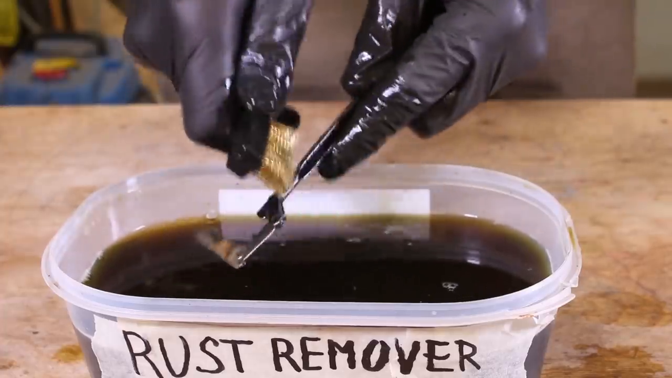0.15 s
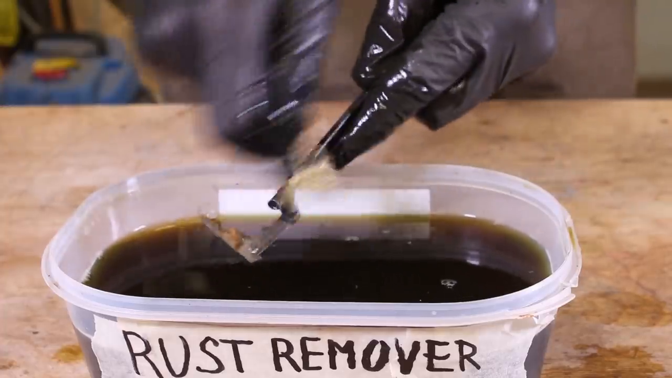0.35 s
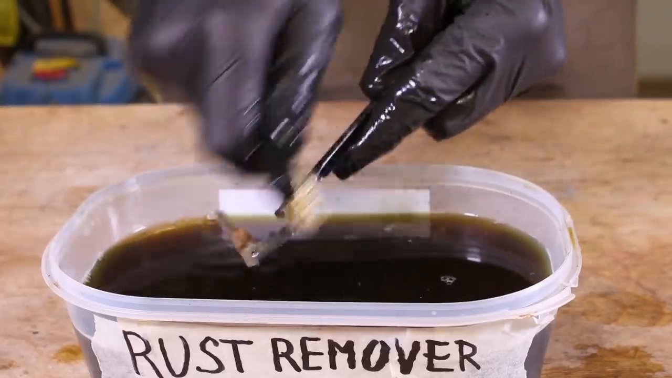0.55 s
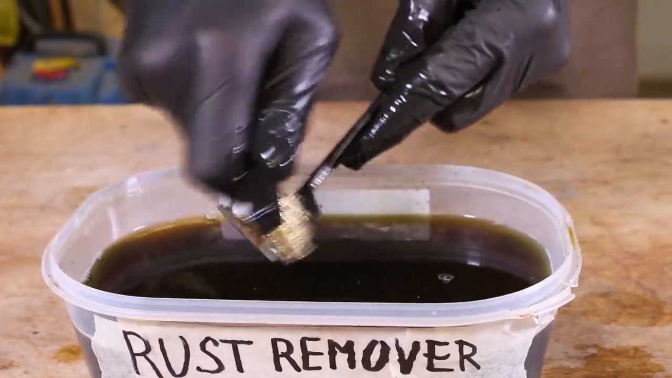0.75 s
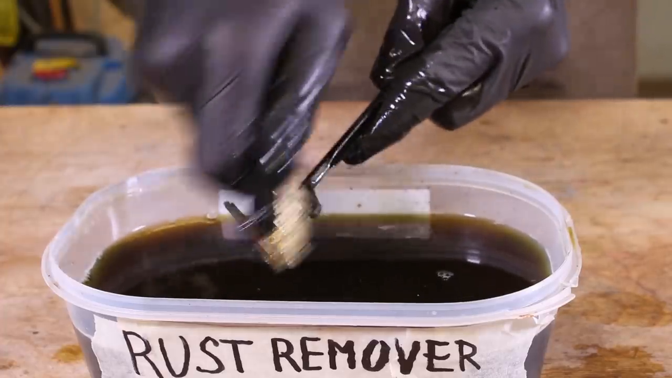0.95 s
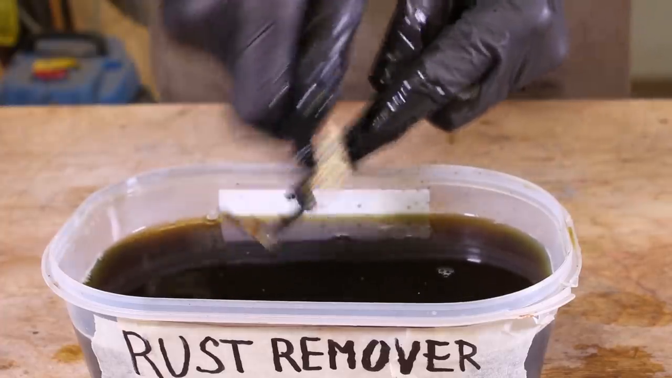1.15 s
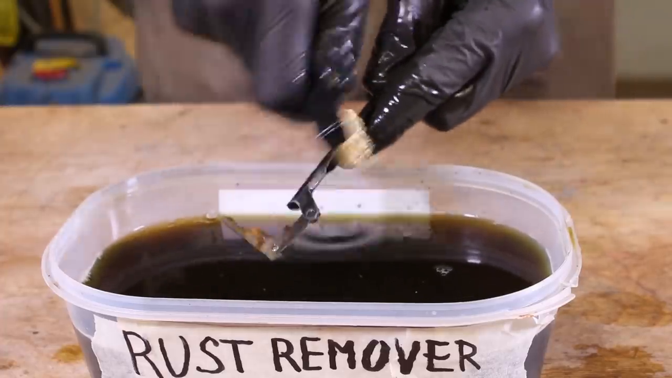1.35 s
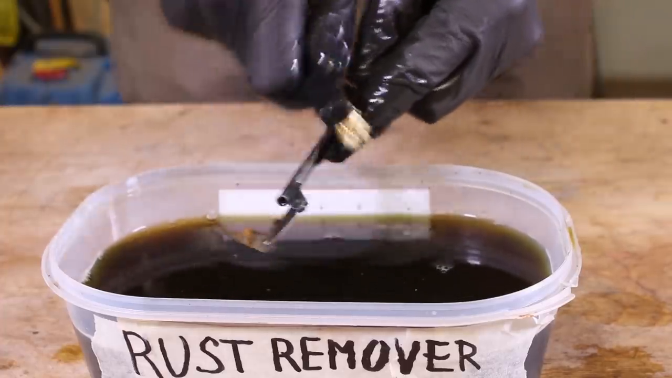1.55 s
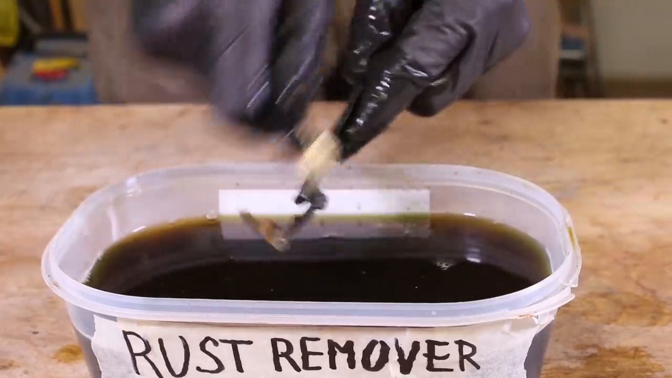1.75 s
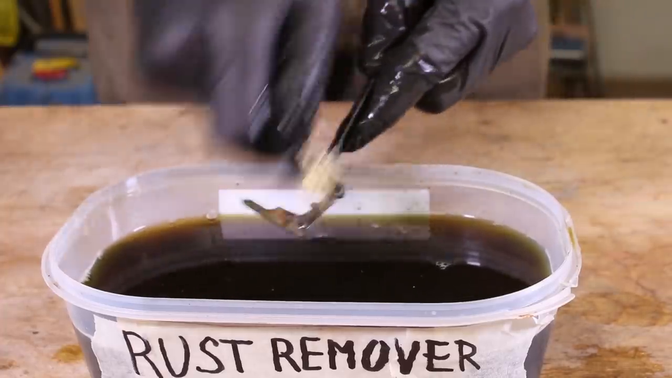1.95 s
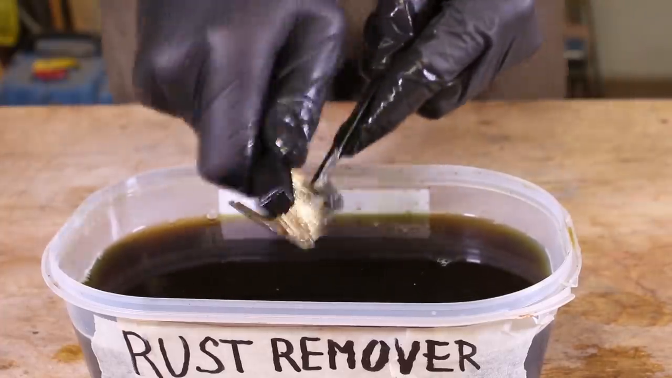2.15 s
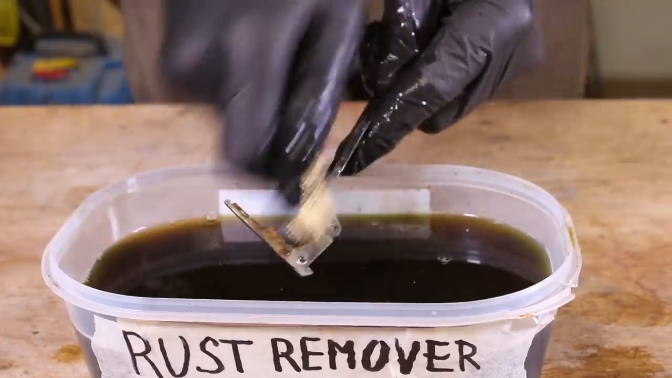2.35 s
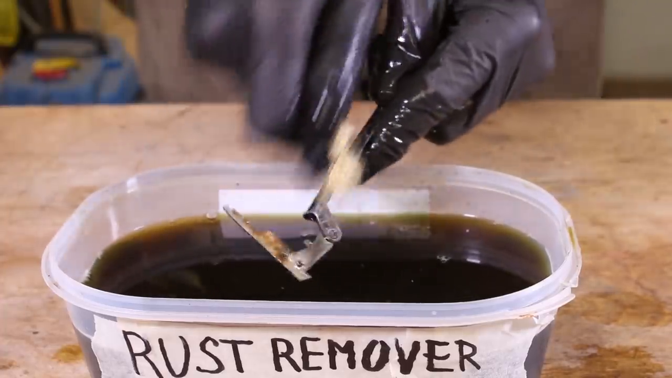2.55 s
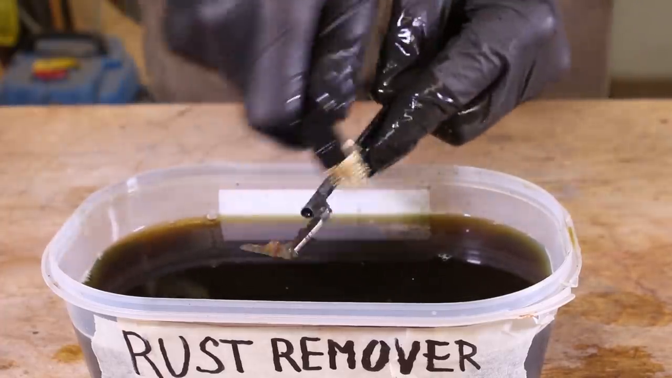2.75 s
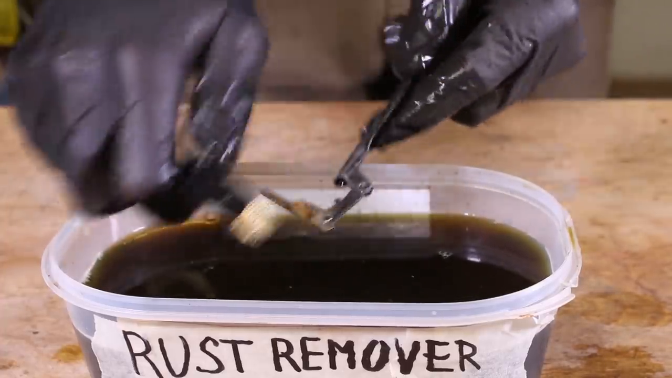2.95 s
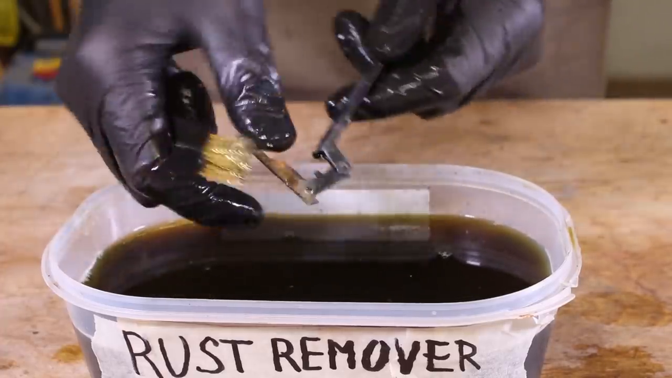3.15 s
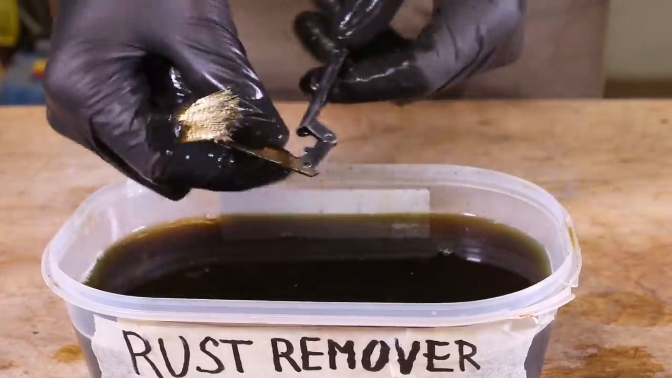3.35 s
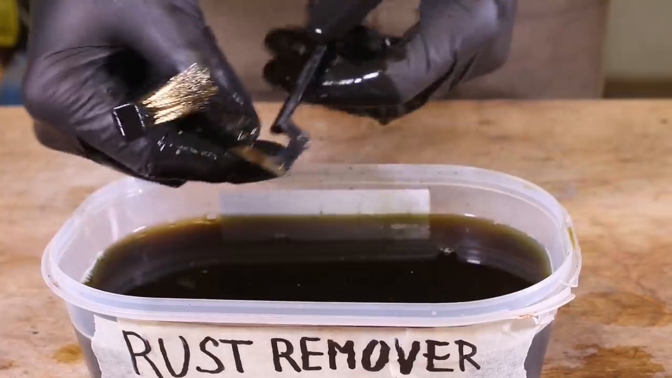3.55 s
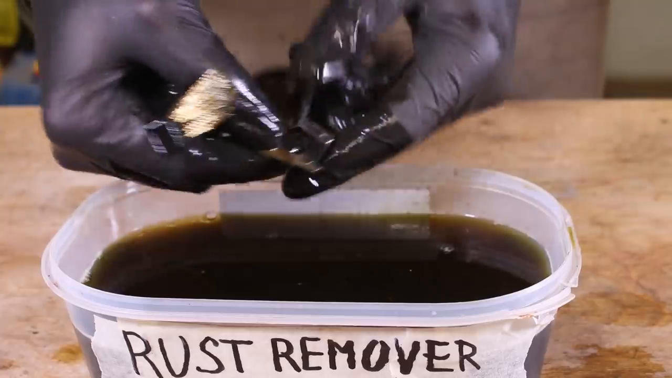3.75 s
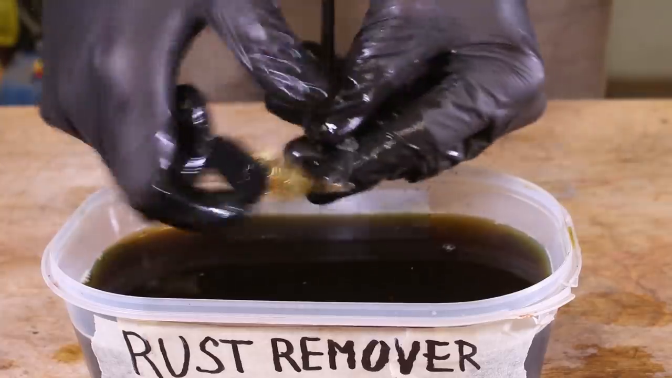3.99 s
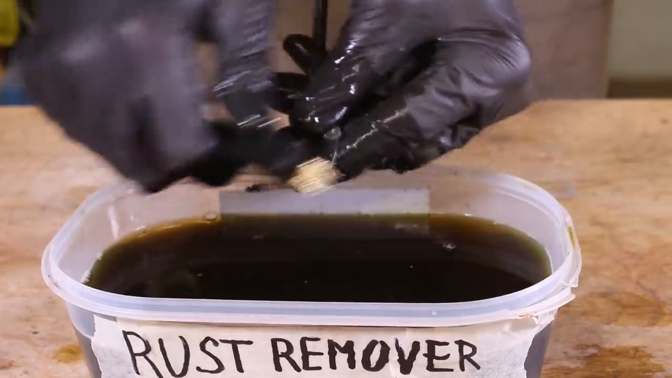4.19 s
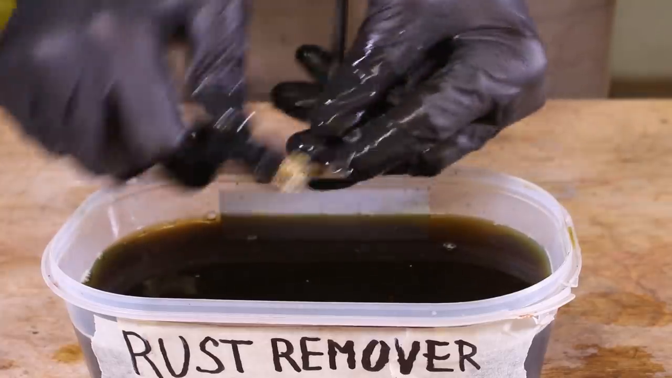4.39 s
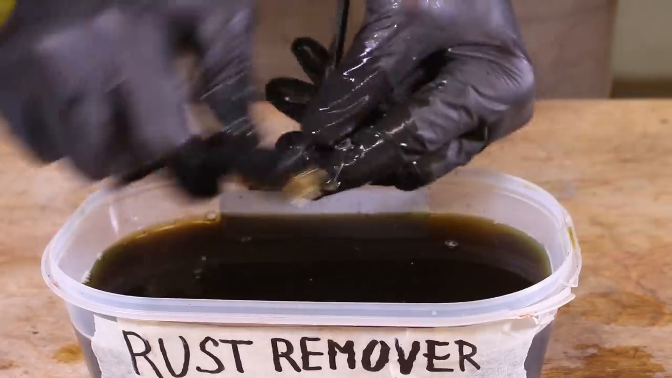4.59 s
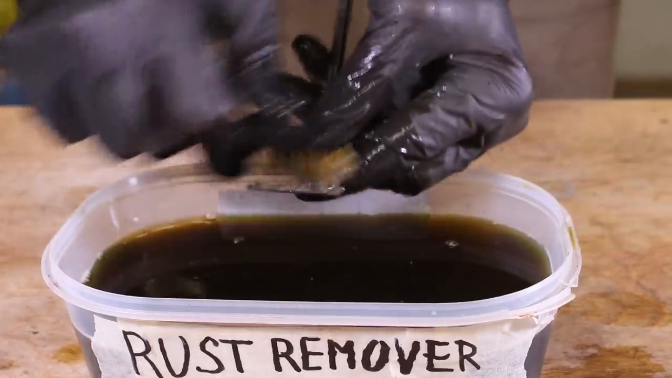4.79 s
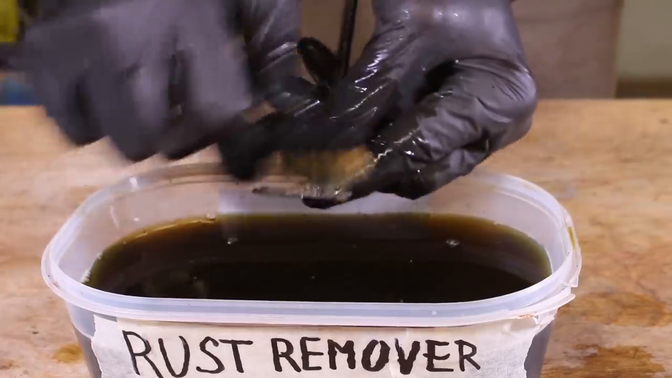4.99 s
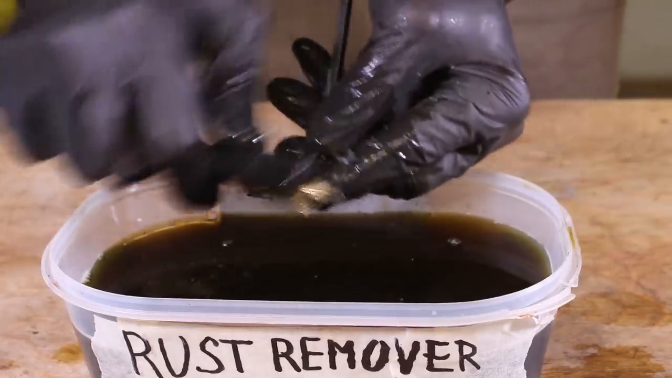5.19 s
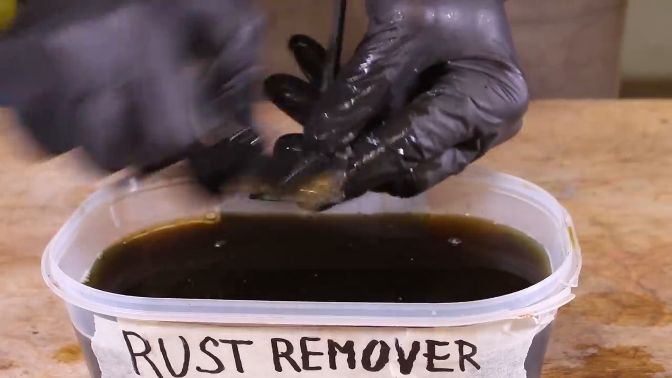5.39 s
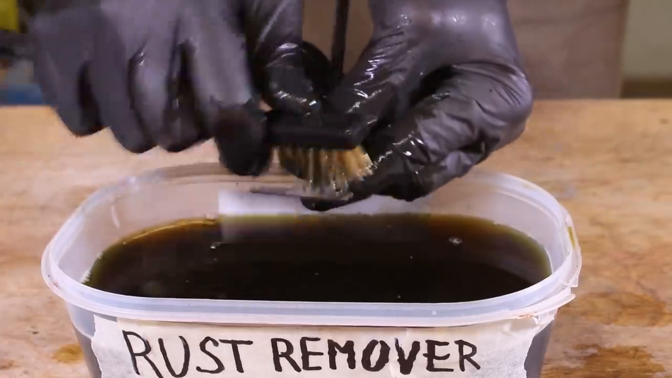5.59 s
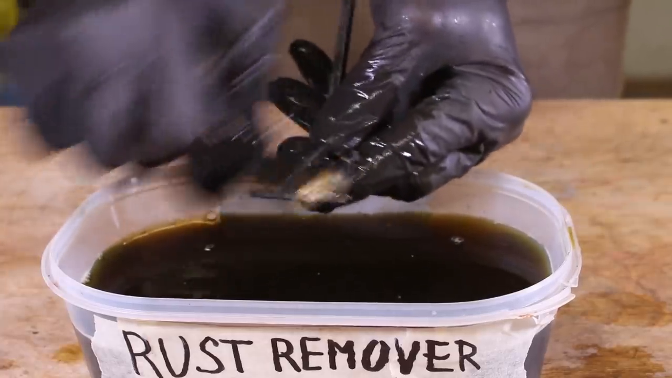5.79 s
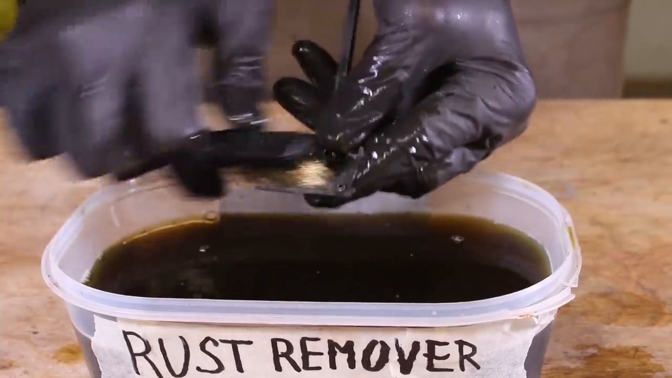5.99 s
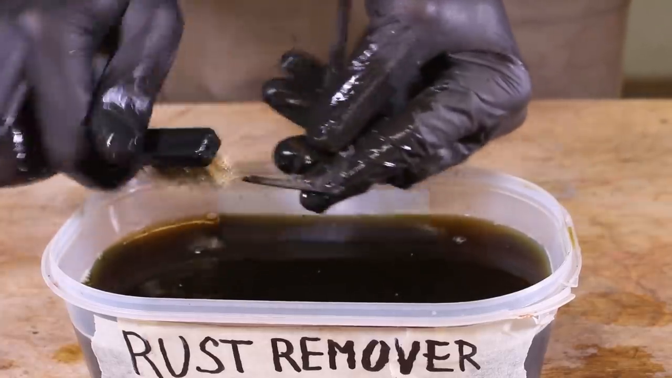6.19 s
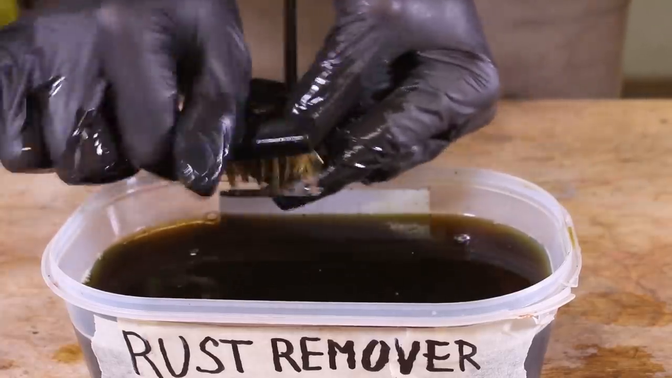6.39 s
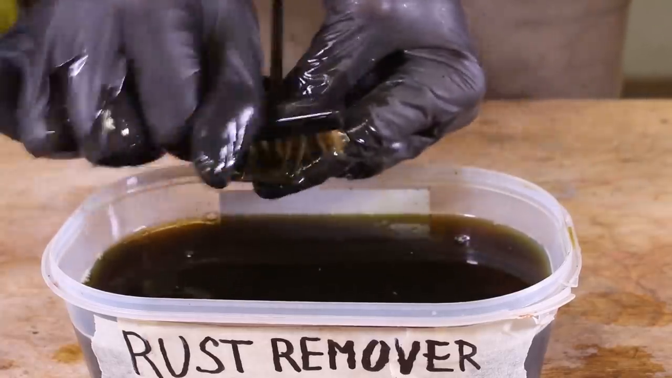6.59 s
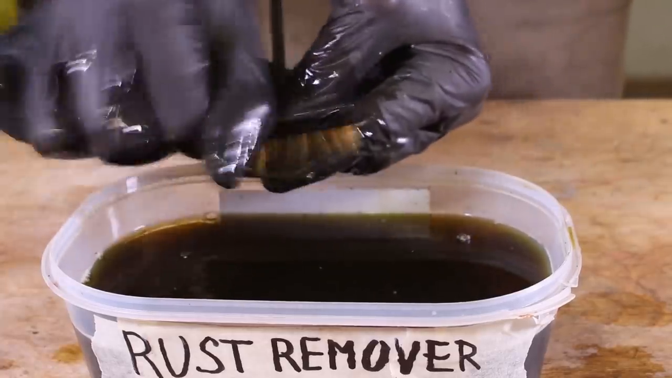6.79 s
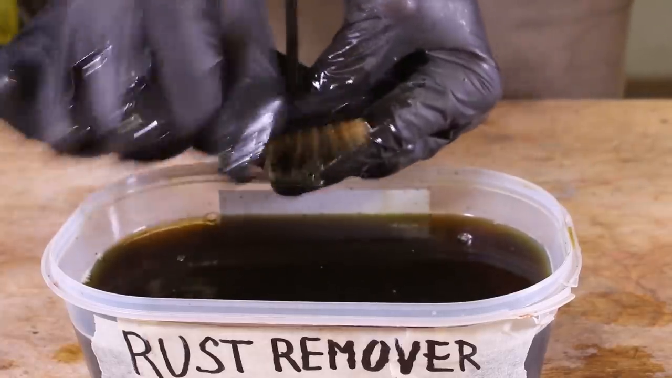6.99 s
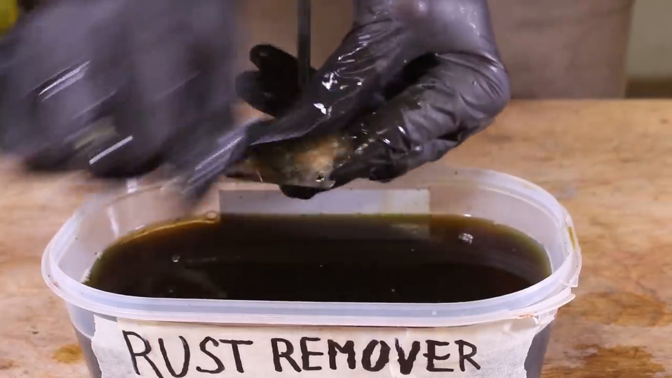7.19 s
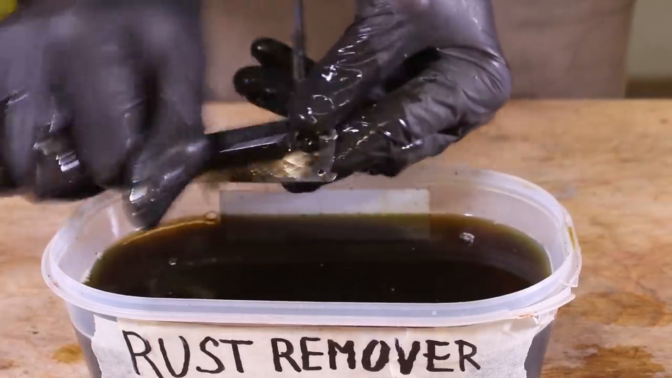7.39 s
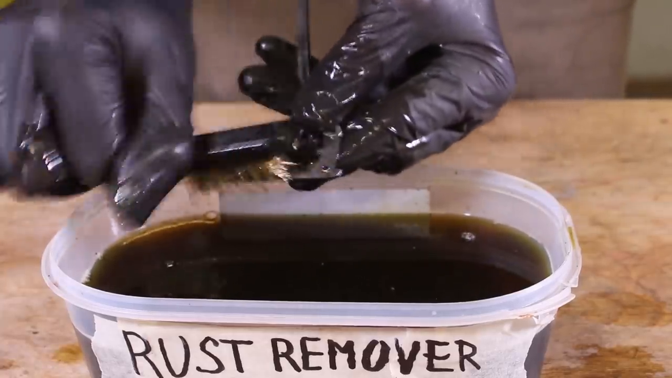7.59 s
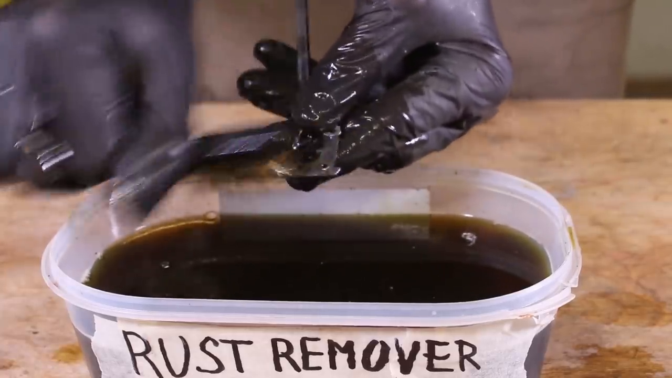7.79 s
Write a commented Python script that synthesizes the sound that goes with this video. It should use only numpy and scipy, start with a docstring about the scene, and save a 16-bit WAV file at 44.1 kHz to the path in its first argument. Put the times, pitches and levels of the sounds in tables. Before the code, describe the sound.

Close, bright, scratchy back-and-forth brushing on small metal, about ten strokes a second, broken by a glove-rubbing pause and a sharp knock.

```python
"""In a quiet workshop, close to the microphone, a small brass brush scrubs a wet, rusty metal part held over
a tub of liquid: about ten strokes a second, in three bouts. Clumped stick-slip impulses, scaled by the speed
of the hand, excite resonances that change with the grip; single wires snap free as short noise bursts.
In the long pause rubber gloves rub, as crackling grains, and the part takes one sharp knock while it is turned.
Damped mode clusters clink, noise puffs slap, and low rumble, hiss and wavering tones lie beneath."""
import sys
import numpy as np
from scipy import signal
from scipy.fft import rfft, irfft
from scipy.io import wavfile
from scipy.ndimage import uniform_filter1d

SR = 44100
rng = np.random.default_rng(int(sys.argv[2]) if len(sys.argv) > 2 else 0)


def output_pcm(signal):
    """Save a mono or channel-first signal as 16-bit PCM at the path in sys.argv[1].

    Samples are clipped to [-1, 1] before scaling.
    """
    pcm = np.clip(np.atleast_2d(signal).T, -1, 1) * 32767
    wavfile.write(sys.argv[1], SR, np.round(pcm).astype(np.int16))


N = 345744
TIME = np.arange(N) / SR   # s

# Spectra give relative density, since each is normalised to unit energy.
# Workshop air and microphone hiss: frequency_hz, density_db_per_hz
AIR_SPECTRUM = [(18, -22), (30, 1.5), (68, -10.5), (134, -9.5), (295, -10), (702, -16), (780, -13.5),
                (1190, -19), (1390, -22), (1540, -18.5), (2230, -22), (2900, -20), (3140, -19), (7870, -21),
                (16000, -27)]
# Wavering room tones: pitch_hz, level_db
ROOM_TONES = [(69, -87.5), (152, -92), (300, -85.5), (328, -106)]
# Low rumble: frequency_hz, density_db_per_hz
RUMBLE_SPECTRUM = [(8, -16), (14, 5), (22, -13), (40, -26.5), (90, -50), (200, -56), (400, -48.5)]
# Swings of the arms, felt as rumble: centre_s, level_db, half_width_s (to 1/e)
ARM_SWINGS = [(1.162, -62, 0.14), (1.8, -54, 0.093), (2.33, -50.5, 0.29), (3.0, -65, .17),
              (4.52, -60, 0.064), (5.58, -52.5, 0.17), (5.92, -54.5, 0.045), (7.16, -75, 0.031),
              (7.7, -74, 0.32)]
# A glove slides over the part or the brush: full_level_s, hold_s, rustle_db, hiss_db
GLOVE_RUBS = [(0.11, 0.035, -70.5, -76), (2.934, 0.039, -61, -59), (3.068, 0.021, -63, -63),
              (3.148, 0.02, -66, -70), (3.207, 0.0049, -67.5, -66), (3.318, 0.0054, -56.5, -62),
              (3.46, 0.044, -75.5, -75), (3.546, 0.1, -86, -80), (3.697, .16, -73, -60),
              (3.917, .005, -61, -70), (4.022, 0.01, -57, -61), (4.07, 0.01, -70, -86),
              (6.22, 0.21, -86, -79)]
# Dull rustle of a dragging glove: frequency_hz, density_db_per_hz
RUSTLE_SPECTRUM = [(1200, -19), (2000, -10), (2900, -6), (3600, -8.5), (5000, -1.5), (7000, -11),
                   (10000, -13), (13000, -9), (16000, -22)]
# Hiss of a sliding glove: frequency_hz, density_db_per_hz
HISS_SPECTRUM = [(3500, -30), (6000, -16), (7200, -8), (8400, 1), (9300, -5), (10200, -23), (12500, -14.5),
                 (16000, -33)]
# Soft wet slaps and bumps of the hands, level before shaping: start_s, level_db, rise_s, t60_s, low_hz, high_hz
HAND_SLAPS = [(0.43, -69, 0.014, 0.17, 310, 455), (2.06, -50.5, 0.0031, 0.45, 60, 150),
              (2.066, -48.5, 0.018, 0.28, 1190, 2680), (2.086, -54, 0.0067, 0.39, 320, 776),
              (2.14, -46, 0.011, 0.26, 60, 158), (2.533, -45.5, 0.013, 0.18, 1560, 5500),
              (2.533, -57.5, 0.015, 0.12, 326, 1270), (2.961, -67.5, 0.037, 0.88, 60.4, 104),
              (3.907, -55, 0.0016, 0.09, 494, 910), (3.908, -49.5, 0.011, 0.18, 1730, 7540),
              (5.211, -67.5, 0.017, 0.69, 40, 86), (5.539, -59.5, 0.033, 0.21, 36, 63),
              (7.054, -52.5, 0.0013, 0.064, 860, 1300)]
# The loose part or one wire rings after a knock, level before decay: start_s, pitch_hz, level_db, t60_s
PART_CLINKS = [(0.713, 2440, -53, 0.26), (0.753, 2960, -52.5, 0.2), (2.945, 5270, -50, 0.045),
               (3.082, 4260, -55, 0.058), (3.906, 1685, -43.5, .05), (3.908, 3300, -40.5, 0.022),
               (4.255, 5540, -47.5, 0.16), (7.057, 4600, -43, 0.11)]
# Wires snapping free and light knocks, level over 3 ms before a common trim:
# start_s, level_db, centre_hz, width_octaves
WIRE_SNAPS = [(0.2315, -47.5, 7150, 1.4), (0.249, -53, 6900, 0.77), (0.9635, -41, 8800, 0.34),
              (1.6399, -34.5, 6000, 0.89), (2.206, -30, 13000, 0.12), (2.3427, -28, 7450, 0.11),
              (2.5391, -26, 6840, 0.5), (2.5576, -30.5, 7460, 1.3), (2.883, -42, 12300, 0.17),
              (2.943, -40, 7300, 1.2), (3.083, -57, 5500, 1.5), (3.3122, -55, 8900, 1.8),
              (3.9075, -32, 4280, 3.5), (4.235, -50, 8600, 0.56), (4.2511, -45.5, 7900, 1.1),
              (4.2837, -36, 8000, 0.45), (4.703, -32, 5460, 0.86), (4.8984, -33, 7700, 1.2),
              (5.1487, -34, 13300, 0.12), (5.1943, -31, 12000, 0.8), (5.499, -31, 7150, 1.9),
              (7.0259, -27.5, 3960, 0.75), (7.0443, -34, 5500, 2.1), (7.0565, -26.5, 3750, 0.72),
              (7.115, -36, 6600, 1.1), (7.121, -29, 5400, 1.2), (7.211, -32.5, 5970, 4.5),
              (7.2202, -28, 6250, 1), (7.269, -24.5, 6900, 0.52), (7.3727, -26, 7300, 0.5),
              (7.42, -38, 10400, 1.5), (7.5579, -33.5, 4230, 1.3), (7.6115, -37, 7700, 1)]
# Runs of scrubbing: end_s, alternation_db (every second stroke brighter, the others duller), landing_s
SCRUB_BOUTS = [(2.917, 1.5, 0.026), (6.16, 0.5, 0.017), (7.87, 0.5, 0.027)]
# One push or pull, lasting until the next or the end of the bout: start_s, peak_drive_db,
# peak_position (share of the stroke), breadth (no unit: below 1 a quick jab, near 2 an even drag)
BRUSH_STROKES = [(0.217, -43.5, 0.8, 0.95), (0.374, -34, 0.67, 0.71), (0.488, -38, 0.53, 2.1),
                 (0.603, -34.0, 0.65, 0.68), (0.705, -37.5, 0.57, 1.3), (0.835, -38.0, 0.59, 1.2),
                 (0.951, -36.5, 0.67, 0.5), (1.068, -36, 0.45, 0.74), (1.218, -35, 0.78, 0.26),
                 (1.307, -35, 0.45, 1.2), (1.43, -31.5, 0.68, 0.33), (1.535, -37, 0.62, 1.8),
                 (1.651, -41.5, 0.6, 2.8), (1.772, -37.5, 0.45, 0.91), (1.907, -36, 0.62, 0.64),
                 (2.011, -34.5, 0.78, 1.47), (2.125, -38, 0.2, 1.7), (2.243, -36.5, 0.65, 1.56),
                 (2.361, -40.5, 0.24, 2.9), (2.471, -31.5, 0.69, 0.42), (2.588, -44, 0.22, 4.6),
                 (2.715, -40.5, 0.43, 0.65), (2.817, -53, 0.44, 3.5), (4.233, -45.0, 0.23, 0.55),
                 (4.34, -46, 0.48, 0.87), (4.446, -51.5, 0.73, 1.3), (4.557, -45, 0.58, 1.56),
                 (4.663, -44.5, 0.67, 2.3), (4.752, -40.5, 0.42, 0.33), (4.829, -38.5, 0.57, 0.68),
                 (4.925, -37.5, 0.33, 0.45), (4.99, -39.5, 0.53, 1.1), (5.072, -37.5, 0.41, 1.2),
                 (5.145, -35.5, 0.67, 0.49), (5.227, -41.0, 0.47, 1.54), (5.303, -35, 0.66, 0.6),
                 (5.389, -39.0, 0.28, 1.6), (5.461, -34, 0.65, 0.49), (5.531, -40.5, 0.59, 2),
                 (5.607, -32.5, 0.61, 0.46), (5.683, -40.5, 0.41, 1.6), (5.764, -36, 0.58, 0.82),
                 (5.842, -40, 0.48, 2.4), (5.921, -37.5, 0.55, 1.0), (5.999, -43, 0.36, 1.5),
                 (6.101, -58, 0.1, 1.7), (6.348, -46, 0.55, 0.69), (6.501, -46.5, 0.55, 0.43),
                 (6.581, -38.5, 0.58, 1.06), (6.688, -38, 0.52, 1.34), (6.801, -36, 0.65, 0.96),
                 (6.901, -39, 0.37, 1.4), (6.989, -38, 0.54, 0.97), (7.078, -36, 0.34, 1.2),
                 (7.161, -34, 0.57, 0.45), (7.242, -36.0, 0.52, 0.93), (7.319, -35.5, 0.64, 0.43),
                 (7.406, -38, 0.47, 1.7), (7.501, -38.5, 0.61, 0.9), (7.584, -36.5, 0.47, 1.27),
                 (7.686, -34, 0.61, 0.41), (7.772, -37.5, 0.82, 2.4)]
# A tuft sticks on an edge, then lets go at once: release_s, jump_db (negative jumps fall)
TUFT_BITES = [(0.404, 9), (0.866, 7), (1.325, -2), (2.271, 16), (2.739, -7), (4.36, 12), (4.879, 11),
              (4.942, -5), (5.091, 3), (5.246, -1), (5.631, 11), (5.788, 12), (6.623, 11), (6.833, 7),
              (7.100, 4), (7.445, 7), (7.613, 7.5), (7.791, 4)]
# Colour of the slipping wires: frequency_hz, density_db_per_hz
WIRE_SPECTRUM = [(300, -32), (1300, -32.5), (1650, -23), (2050, -18), (2900, -20), (4000, -15),
                 (6500, -8.5), (7600, -4.5), (8600, -1.5), (9400, -9.5), (10300, -12.5), (11600, -6),
                 (13000, -4), (15700, -12)]
# Nominal resonances of the part, damped by the hand: grip_taken_s, [centre_hz, width_hz, gain_db]
GRIP_MODES = [(0.0, [(2270, 1520, 11.5), (4600, 1760, 9.5), (5740, 300, 6.5), (12500, 760, -2)]),
              (1.428, [(2560, 330, 9), (4700, 330, 2.5), (7840, 520, 1), (15100, 440, 6)]),
              (4.2, [(1950, 4300, 8), (4400, 1400, 3), (5050, 630, 12), (5720, 360, 10)]),
              (4.83, [(2160, 820, 8), (3390, 310, 8), (4930, 750, 6.5), (5600, 810, 6.5)]),
              (6.25, [(2090, 1200, 15), (3310, 440, 10.5), (4650, 430, 10.5), (5560, 530, 8),
              (13200, 1400, -3.5)])]
# Gain of the broad treble resonance of the scrape: time_s, gain_db
SCRAPE_BRIGHTNESS = [(0.3, 7), (0.6, 4.5), (1.35, 9), (1.7, 0.5), (1.95, 6.5), (2.1, -1.5), (2.6, 2),
                     (2.85, 9), (4.3, 11), (4.6, 7.5), (4.95, 1), (5.9, 2), (6.05, -1), (6.42, 1.5),
                     (6.55, 4.5), (7.05, -0.5), (7.35, -2.5), (7.8, 3)]
# Gain of the low ring of the part around 2 kHz: time_s, gain_db
LOW_RING = [(0.3, -6), (0.85, -0.5), (1.1, -7), (1.8, -1), (2.2, -5), (2.65, -7), (2.85, 5), (4.27, 13.5),
            (4.4, -4), (4.85, -3), (5.05, -1), (6.05, 1), (6.4, -11.5), (6.7, -4), (6.9, -10.5), (7.8, -5)]

AIR_DB, STILL_RUMBLE_DB = -72, -78
ROOM_T60_S, ROOM_DB = 0.097, -15
RUB_ATTACK_S, RUB_T60_S = 0.027, 0.14
TURN_DIP_DB = 19.5   # how much quieter the brush is where it turns
BEND_S = 0.015       # the wires need this long to take up a change of force
LIFT_S = 0.0098      # the brush leaves the part at the end of a bout
CUTOFF_HZ = 15900


def from_db(db):
    """Amplitude gain is a power of ten of the level in decibels over twenty."""
    return 10 ** (np.asarray(db) / 20)


def rms_one(x):
    """Division by the root mean square sets the effective amplitude to 1."""
    return x / np.sqrt(np.mean(x ** 2) + 1e-20)


def band(x, low_hz, high_hz, order=2):
    """A Butterworth band-pass has a maximally flat passband; its edges are kept below half the sample rate."""
    high_hz = min(high_hz, 0.48 * SR)
    low_hz = min(low_hz, high_hz / 1.1)
    sos = signal.butter(order, [low_hz, high_hz], "band", fs=SR, output="sos")
    return signal.sosfilt(sos, x)


def drift(rate_hz):
    """Interpolated random values make a smooth fluctuation of rms 1 with a new value at the given rate."""
    values = rng.standard_normal(N // 4)
    return rms_one(np.interp(TIME * rate_hz, np.arange(len(values)), values))


def limited_drift(rate_hz):
    """The same fluctuation, held within two standard deviations."""
    return np.clip(drift(rate_hz), -2, 2)


def body(spectrum, modes=(), size=8192):
    """Folding the cepstrum of a spectrum with resonances gives a minimum-phase response of unit energy."""
    hz = np.maximum(np.arange(size // 2 + 1) * SR / size, 1)
    points = np.array(spectrum)
    level_db = np.interp(np.log(hz), np.log(points[:, 0]), points[:, 1])
    for centre_hz, width_hz, gain_db in modes:
        level_db += gain_db / (1 + (2 * (hz - centre_hz) / width_hz) ** 2)
    cepstrum = irfft(np.log(from_db(level_db)))
    # keep only the causal half
    cepstrum[1:size // 2] *= 2
    cepstrum[size // 2 + 1:] = 0
    response = irfft(np.exp(rfft(cepstrum)))
    return response / np.sqrt(np.sum(response ** 2))


def through(x, response):
    """A linear resonator's output is the convolution of its input with its impulse response."""
    return signal.oaconvolve(x, response)[:N]


def grains(per_s, spread_db, clump_db, clump_rate_hz):
    """Random impulses of uneven size, gathered in clumps, model many tiny slips; rms 1."""
    born = rng.random(N) < per_s / SR
    sizes = rng.choice([-1, 1], N) * from_db(spread_db * rng.standard_normal(N))
    return rms_one(born * sizes * from_db(clump_db * limited_drift(clump_rate_hz)))


def workshop_air():
    """Filtered noise is a steady hiss; amplitude and phase modulation make the low tones waver."""
    air = from_db(AIR_DB) * through(rng.standard_normal(N), body(AIR_SPECTRUM))
    tones = np.zeros(N)
    for pitch_hz, level_db in ROOM_TONES:
        swell = 1 + 0.5 * drift(11)
        phase = 2 * np.pi * pitch_hz * TIME + 1.38 * drift(26)   # rad
        tones += from_db(level_db) * rms_one(swell * np.sin(phase))
    return air + tones


def room(x, delay_s=0.0058, size=16384):
    """Dense late reflections from bench and walls act as exponentially decaying noise after a short delay."""
    age = np.arange(size) / SR
    noise = band(rng.standard_normal(size), 300, 8200, order=1)
    tail = noise * from_db(-60 * age / ROOM_T60_S) * (age > delay_s)
    return x + from_db(ROOM_DB) * through(x, tail / np.sqrt(np.sum(tail ** 2)))


def rumble():
    """Very low noise is amplitude-modulated by Gaussian swells as the arms swing."""
    level = np.full(N, from_db(STILL_RUMBLE_DB))
    for centre_s, level_db, half_width_s in ARM_SWINGS:
        level += from_db(level_db) * np.exp(-((TIME - centre_s) / half_width_s) ** 2)
    return level * rms_one(through(rng.standard_normal(N), body(RUMBLE_SPECTRUM, size=32768)))


def gloves():
    """Friction of wet rubber is a train of fine slips, dull when it drags and hissing when it slides."""
    rustle, hiss = np.zeros(N), np.zeros(N)
    for full_s, hold_s, rustle_db, hiss_db in GLOVE_RUBS:
        attack = np.clip(1 + (TIME - full_s) / RUB_ATTACK_S, 0, 1)
        decay = from_db(-60 * np.clip((TIME - full_s - hold_s) / RUB_T60_S, 0, 2))
        rustle += from_db(rustle_db) * attack * decay
        hiss += from_db(hiss_db) * attack * decay
    out = np.zeros(N)
    for level, spectrum in [(rustle, RUSTLE_SPECTRUM), (hiss, HISS_SPECTRUM)]:
        crackle = grains(per_s=9000, spread_db=3.0, clump_db=2.5, clump_rate_hz=160)
        out += through(level * crackle, body(spectrum))
    return out


def slaps(lump_db=1.5, lump_rate_hz=90, size=16384):
    """A soft impact is band-limited noise that rises linearly and decays exponentially, with uneven level."""
    out, age = np.zeros(N + size), np.arange(size) / SR
    for start_s, level_db, rise_s, t60_s, low_hz, high_hz in HAND_SLAPS:
        decay = from_db(-60 * np.maximum(age - rise_s, 0) / t60_s)
        shape = np.minimum(age / rise_s, 1) * decay
        puff = rms_one(band(rng.standard_normal(size), low_hz, high_hz))
        at = round(start_s * SR)
        out[at:at + size] += from_db(level_db) * shape * puff
    return out[:N] * from_db(lump_db * limited_drift(lump_rate_hz))


def clinks(spread=0.07, count=9, size=16384):
    """A knock excites a cluster of close modes, whose energy the glove quickly damps."""
    out, age = np.zeros(N + size), np.arange(size) / SR
    for start_s, pitch_hz, level_db, t60_s in PART_CLINKS:
        pitches_hz = pitch_hz * (1 + spread * rng.uniform(-1.2, 1, count))
        cycles = pitches_hz[:, None] * age + rng.random((count, 1))
        cluster = np.sin(2 * np.pi * cycles).sum(axis=0)
        at = round(start_s * SR)
        out[at:at + size] += from_db(level_db) * rms_one(cluster) * from_db(-60 * age / t60_s)
    return out[:N]


def snaps(t60_s=0.0065, crack_db=11, trim_db=-2.5, size=2048):
    """Sudden release of strain is an impulse with a few milliseconds of chatter, coloured by the brush."""
    out, age = np.zeros(N + size), np.arange(size) / SR
    colour = body(WIRE_SPECTRUM, [(2030, 1130, 19.8), (4530, 4800, 15.6)])[:size]
    window = 0.003 * SR   # samples over which the level is defined
    for start_s, level_db, centre_hz, octaves in WIRE_SNAPS:
        chatter = rng.standard_normal(size) * from_db(-60 * age / t60_s)
        chatter[0] = from_db(crack_db)
        coloured = signal.fftconvolve(chatter, colour)[:size]
        half_band = 2 ** (octaves / 2)
        snap = band(coloured, centre_hz / half_band, centre_hz * half_band, order=1)
        at = round(start_s * SR)
        out[at:at + size] += from_db(level_db) * snap * np.sqrt(window / np.sum(snap ** 2))
    return from_db(trim_db) * out[:N]


def strokes():
    """Reciprocating motion splits into strokes: start_s, end_s, drive_db, peak_position, breadth, brightness_db."""
    rows, begin_s = [], 0
    for end_s, swing_db, _ in SCRUB_BOUTS:
        bout = [row for row in BRUSH_STROKES if begin_s <= row[0] < end_s]
        turns = [row[0] for row in bout[1:]] + [end_s]
        for k, ((start_s, drive_db, crest, breadth), stop_s) in enumerate(zip(bout, turns)):
            brightness_db = swing_db if k % 2 else -swing_db   # push and pull differ
            rows.append((start_s, stop_s, drive_db, crest, breadth, brightness_db))
        begin_s = end_s
    return rows


def stroke_force():
    """Hand speed follows a skewed half sine between turns; the excitation follows that speed."""
    force = np.zeros(N)
    for start_s, stop_s, drive_db, crest, breadth, _ in strokes():
        span = slice(int(start_s * SR), int(stop_s * SR))
        fastest_s = start_s + np.clip(crest, 0.1, 0.9) * (stop_s - start_s)
        phase = np.interp(TIME[span], [start_s, fastest_s, stop_s], [0, np.pi / 2, np.pi])
        speed = np.sin(phase)
        force[span] = from_db(drive_db - TURN_DIP_DB * (1 - speed) ** breadth)
    return uniform_filter1d(force, max(int(BEND_S * SR), 1))


def contact():
    """Excitation needs contact: the share of wires touching rises at each bout's start and falls at its end."""
    touching, begin_s = np.zeros(N), 0
    for end_s, _, landing_s in SCRUB_BOUTS:
        first_s = min(row[0] for row in BRUSH_STROKES if row[0] >= begin_s)
        landing = np.clip((TIME - first_s) / landing_s, 0, 1)
        lifting = np.clip((end_s - TIME) / LIFT_S, 0, 1)
        touching += landing * lifting
        begin_s = end_s
    return touching


def stick_and_slip(stick_s=0.041, slip_s=0.0046):
    """Stick-slip as a level in dB: it departs from the mean, jumps across it at release, then relaxes."""
    level_db = np.zeros(N)
    for release_s, jump_db in TUFT_BITES:
        near = np.abs(TIME - release_s) < 0.1
        age = TIME[near] - release_s
        time_constant_s = np.where(age < 0, stick_s, slip_s)
        level_db[near] += 0.5 * jump_db * np.sign(age) * np.exp(-np.abs(age) / time_constant_s)
    return level_db


def slipping_wires(spread_db=1.5, patchy_db=0.99, own_clump_db=1.73, clump_db=1.26, catch_db=1.5,
                   flicks_per_s=260, flick_db=-8):
    """Partly correlated slips: long and short wire ends chatter in their own bands but catch in tufts together."""
    edges_hz = [100, 3200, 6500, 10500, 20000]
    registers = np.zeros(N)
    for low_hz, high_hz in zip(edges_hz, edges_hz[1:]):
        chatter = band(grains(14000, spread_db, own_clump_db, 300), low_hz, high_hz, order=4)
        registers += chatter * from_db(patchy_db * drift(35))
    shared_db = clump_db * limited_drift(900) + catch_db * limited_drift(170)
    scrape = rms_one(registers * from_db(shared_db))
    # stiffer wires flick off the edge one by one
    flicks = grains(flicks_per_s, spread_db=2.5, clump_db=5.0, clump_rate_hz=53)
    return rms_one(scrape + from_db(flick_db) * flicks)


def stroke_modes(middle_s, brightness_db, detune=0.025, grip_db=0.5, contact_db=3.5):
    """Boundary conditions set the modes: grip shifts and damps them, and each landing spot favours a few others."""
    held = [modes for taken_s, modes in GRIP_MODES if taken_s < middle_s][-1]
    modes = []
    for centre_hz, width_hz, gain_db in held:
        shifted_hz = centre_hz * np.exp(detune * rng.standard_normal())
        modes.append((shifted_hz, width_hz, gain_db + grip_db * rng.standard_normal()))
    for spot_hz in np.exp(rng.uniform(np.log(2000), np.log(15000), size=12)):
        modes.append((spot_hz, 0.081 * spot_hz, contact_db * rng.uniform(-1.18, 1)))
    ring_db = np.interp(middle_s, *np.transpose(LOW_RING))
    bright_db = np.interp(middle_s, *np.transpose(SCRAPE_BRIGHTNESS)) + brightness_db
    # a brighter stroke trades middle for top
    return modes + [(2160, 2500, ring_db), (5600, 2200, -0.5 * bright_db), (12100, 7100, bright_db)]


def brush(size=2048):
    """Source and resonator: slips scaled by hand speed and contact ring the part as it is held in each stroke."""
    slips = from_db(stick_and_slip()) * contact() * stroke_force() * slipping_wires()
    out = np.zeros(N + size)
    for start_s, stop_s, *_, brightness_db in strokes():
        first, last = int(start_s * SR), min(int(stop_s * SR), N)
        modes = stroke_modes((start_s + stop_s) / 2, brightness_db)
        response = body(WIRE_SPECTRUM, modes, size=size)
        out[first:last + size - 1] += signal.fftconvolve(slips[first:last], response)
    return out[:N]


def scene():
    """Superposition of brush and part in the room, with hands and air; the two channels are almost alike."""
    in_room = room(brush() + snaps() + clinks())
    sound = in_room + slaps() + gloves() + rumble() + workshop_air()
    # only a faint hiss and a faint late copy of the treble differ between the ears
    hiss = from_db(-91.5) * rms_one(band(rng.standard_normal(N), 50, 900, order=1))
    late = np.pad(sound, (410, 0))[:N]   # 410 samples, about 9.3 ms
    side = hiss + from_db(-46.5) * band(late, 11000, 0.48 * SR, order=1)
    return sound + side * np.array([[1], [-1]])


def record(dry):
    """An elliptic low-pass trades passband ripple for a steep cut of the top."""
    sos = signal.ellip(12, 0.1, 80, CUTOFF_HZ, fs=SR, output="sos")
    return signal.sosfilt(sos, dry)


dry = scene()
out = record(dry)
output_pcm(out)
```